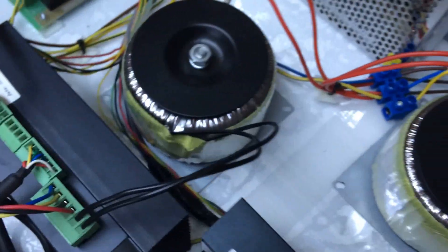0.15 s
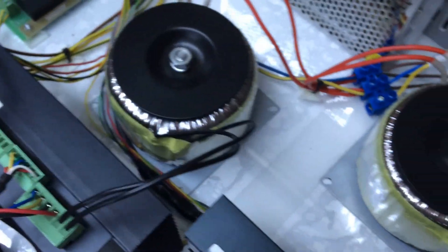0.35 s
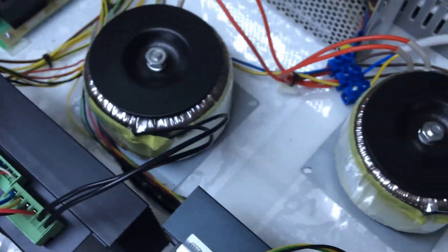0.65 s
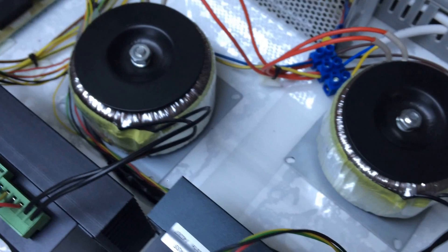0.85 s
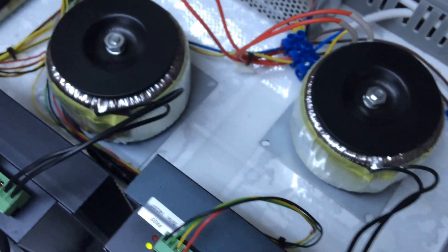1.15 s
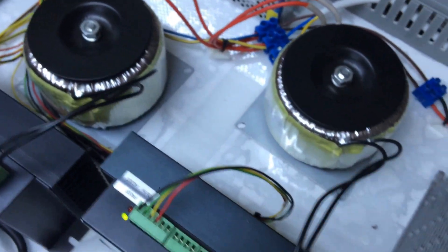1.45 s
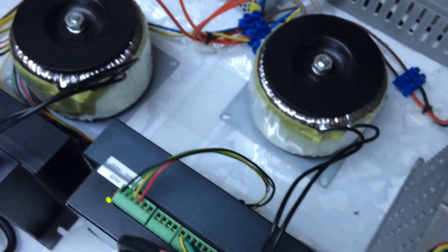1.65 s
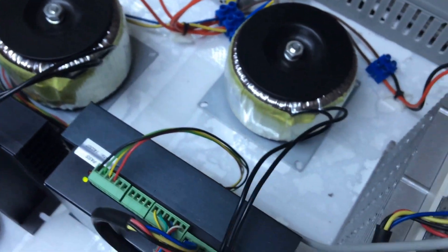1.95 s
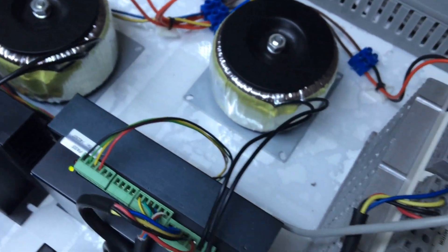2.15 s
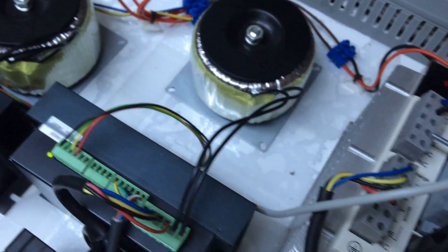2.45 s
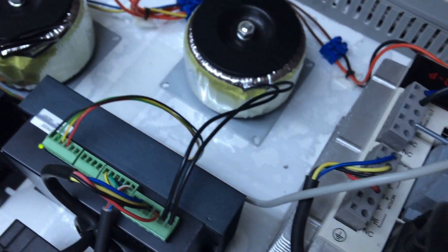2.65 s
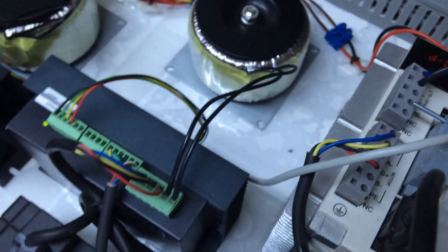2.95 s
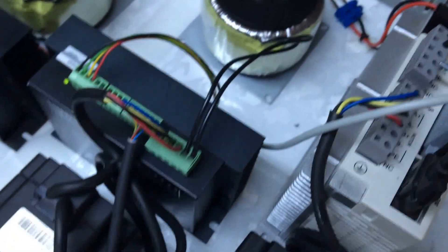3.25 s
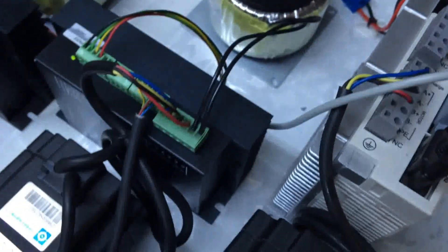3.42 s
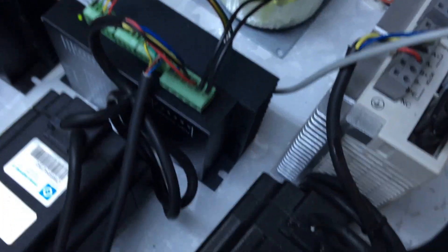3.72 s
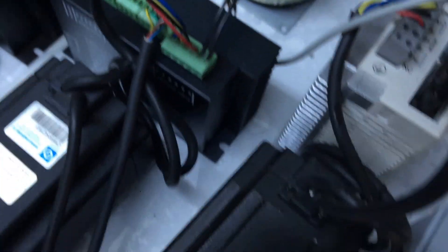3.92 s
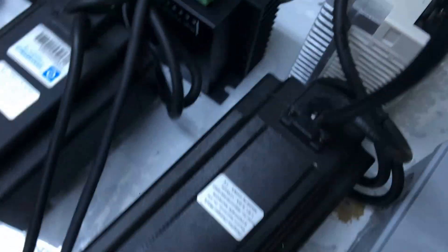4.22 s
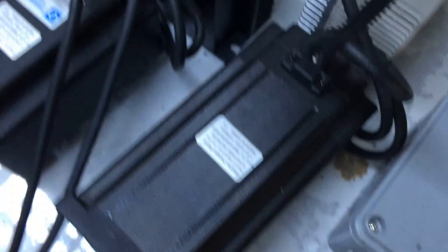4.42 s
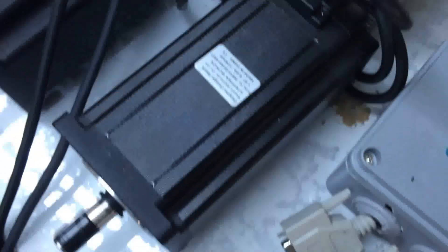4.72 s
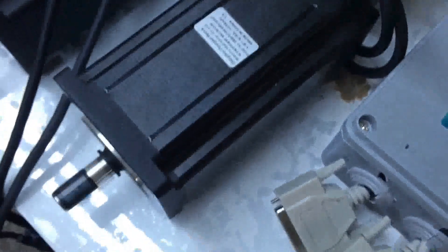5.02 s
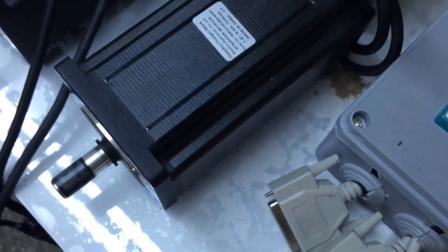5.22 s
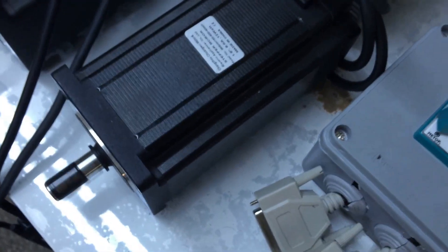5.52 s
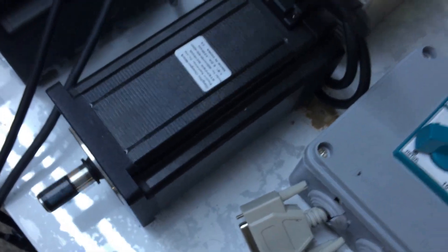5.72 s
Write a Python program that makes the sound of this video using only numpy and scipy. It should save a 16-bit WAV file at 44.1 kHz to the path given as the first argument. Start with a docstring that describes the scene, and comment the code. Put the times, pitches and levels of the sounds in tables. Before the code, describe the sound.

A stepper motor whines steadily and stops, then a closer, much louder one spins up, over low room rumble.

```python
"""A workbench, where two closed-loop stepper motors take turns over the rumble and air of the room.
The far one ramps up, holds about 26 turns a second and ramps down. A hand-held microphone, softly
knocked, moves from the drivers to the near one, which after a low hum ramps up to the same speed.
Their 50 rotor teeth whine through the housings' resonances, mains ripple shakes the pitch,
bearings rustle, the drivers whistle and the near motor's coils hiss."""
import sys
import numpy as np
from scipy import signal
from scipy.fft import rfft, irfft
from scipy.io import wavfile
from scipy.ndimage import uniform_filter1d

SR = 44100
rng = np.random.default_rng(int(sys.argv[2]) if len(sys.argv) > 2 else 0)


def generate_wav(sig):
    """Save sig (samples, or channels by samples) to the path in sys.argv[1] as 16-bit PCM at SR."""
    pcm = np.round(np.clip(np.atleast_2d(sig).T, -1, 1) * 32767).astype(np.int16)
    wavfile.write(sys.argv[1], SR, pcm)


N = 258867
T = np.arange(N) / SR
BINS = np.fft.rfftfreq(2 * N, 1 / SR)

TURNS_HZ, TEETH, STEPS_PER_TURN = 25.7325, 50, 1600
TOOTH_HZ = TEETH * TURNS_HZ
RIPPLE_HZ, DRIVER_CLOCK_HZ = 100, 20000
FAR_START_S, FAR_STOP_S, NEAR_START_S, RAMP_S = .282, 2.426, 4.346, .158


def undb(db):
    """Decibels to gain."""
    return 10 ** (np.asarray(db) / 20)


def unit(x):
    """Scale to rms 1."""
    return x / np.std(x)


def angle(hz):
    """Running phase of a frequency curve, in radians."""
    return 2 * np.pi * np.cumsum(hz) / SR


def walk(rate_hz):
    """Smooth random drift of spread 1."""
    hold = max(int(SR / rate_hz), 1)
    return unit(uniform_filter1d(rng.standard_normal(N)[np.arange(N) // hold], hold))


def spectrum(points):
    """EQ curve through (f/Hz, level/dB) points."""
    hz, db = np.transpose(points)
    return undb(np.interp(np.log(BINS + 1), np.log(hz), db))


def resonance(modes):
    """EQ curve of a set of resonant peaks."""
    return np.sqrt(sum(undb(db) ** 2 / (1 + (2 * (BINS - hz) / width) ** 2) ** 2
                       for hz, width, db in modes))


def colour(x, gain):
    """Causal filter with the given gain, so that resonances ring after the push."""
    cepstrum = irfft(np.log(gain + 1e-9))
    cepstrum[1:N] *= 2
    cepstrum[N + 1:] = 0
    return irfft(rfft(x, 2 * N) * np.exp(rfft(cepstrum)))[:N]


# room tone EQ: (f/Hz, relative level/dB)
ROOM_EQ = [(15, -30), (28, -23), (44, -8), (69, 1.5), (278, -18.5), (326, -18), (363, -29), (501, -22.5),
           (729, -33), (978, -25), (1310, -28.5), (1960, -26.5), (4620, -39), (5140, -42), (7500, -51),
           (10000, -51), (12500, -57), (15000, -49)]
# room faders as the microphone moves: (t/s, rumble level/dB, air level/dB)
ROOM_FADERS = [(.3, -44.5, -42), (1.5, -47.5, -45.5), (4.25, -44, -45), (4.8, -48, -64), (5.87, -47, -60)]


def room_tone(split_hz):
    """Restless rumble under a smooth rush of air."""
    times, *faders = np.transpose(ROOM_FADERS)
    rumble_db, air_db = [np.interp(T, times, db) for db in faders]
    noise = unit(colour(rng.standard_normal(N), spectrum(ROOM_EQ)))
    rumble = signal.sosfiltfilt(signal.butter(2, split_hz, fs=SR, output="sos"), noise)
    air = noise - rumble
    return rumble * undb(rumble_db + 0.98 * walk(14)) + air * undb(air_db + 0.44 * walk(4.92))


def jolts(hits, housing, decay_s):
    """Short rattles ring the housing, as when a rotor breaks away or snaps into place."""
    out = 0
    for s, db in hits:
        rattle = rng.standard_normal(N) * (T >= s) * np.exp(-np.abs(T - s) / decay_s)
        ring = colour(rattle, resonance(housing))
        out = out + undb(db) * ring / np.abs(ring).max()
    return out


def body(housing, ragged_db, radiate_hz):
    """EQ from rotor force to air: main resonances, many small panel modes and little bass."""
    panels = np.append(walk(57.13), 0)  # random peaks and dips along frequency
    # the small modes lie between the cruising tooth harmonics, which sweep them on the ramps
    panels *= np.abs(np.sin(np.pi * BINS / TOOTH_HZ))
    radiation = undb(-40) + BINS ** 4 / (BINS ** 4 + radiate_hz ** 4)
    return (1 + resonance(housing)) * undb(ragged_db * panels) * radiation


def strain(speed, calm_s):
    """Envelope that is 1 below full speed and dies away once the speed holds."""
    last_ramp_s = np.maximum.accumulate(np.where(speed < 1, T, 0))
    return np.exp((last_ramp_s - T) / calm_s)


def tooth_levels(harmonics, dead_spots, unsettled):
    """Faders in dB: each harmonic settles, and dips where the microphone crosses its dead spot."""
    levels = [db + overshoot_db * unsettled for db, overshoot_db in harmonics]
    for harmonic, s, width_s, depth_db in dead_spots:
        away = ((T - s) / width_s) ** 2
        levels[round(harmonic) - 1] += 10 * np.log10((away + undb(depth_db) ** 2) / (away + 1))
    return levels


def rough_running(speed, worst, width):
    """How jerky the rotor is: most around one share of full speed, not at rest or when cruising."""
    return np.exp(-((speed - worst) / width) ** 2) * (speed > 0) * np.sqrt(1 - speed)


def whine(speed, tooth_db, orders, body_eq, jerks_db, jerky, flutter_db,
          ripple_rad, jitter_rad, fade_power):
    """Partials locked to the shaft; on the ramps each flares and drops as it crosses the resonances."""
    # supply ripple and small speed errors rock the shaft, so high orders grow the widest sidebands
    rocking = ripple_rad * np.sin(2 * np.pi * RIPPLE_HZ * T) + jitter_rad * walk(120)
    shaft = angle(TURNS_HZ * speed) + rocking / TEETH
    partials = [(TEETH * k, undb(db + flutter_db * walk(75)) * speed ** fade_power, 0)
                for k, db in enumerate(tooth_db, 1)]
    for order, db in orders:
        size = undb(tooth_db[0] + db + 0.75 * walk(3.29)) * speed ** 6
        partials.append((round(order), size, rng.uniform(0, 2 * np.pi)))
    force = 0
    for order, size, phase in partials:
        makeup = 1 / np.interp(order * TURNS_HZ, BINS, body_eq)  # cancels the EQ at full speed
        force = force + size * makeup * np.sin(order * shaft + phase)
    # at low speed the rotor moves from tooth to tooth in uneven jerks
    stagger = TEETH * shaft + .14 * walk(500)
    jerks = sum(undb(db) * np.sin(k * stagger) for k, db in enumerate(jerks_db, 1))
    return colour(force + jerks * undb(2.5 * walk(200)) * jerky, body_eq)


def bearing_rustle(speed, eq, repeat, ramp_db):
    """Bearing roughness: a share of it repeats with every turn; it is boosted on the ramps."""
    track = rng.standard_normal(int(SR / TURNS_HZ))
    place = np.cumsum(speed) * TURNS_HZ / SR * len(track)
    looped = track[place.astype(int) % len(track)] * speed
    rough = np.sqrt(repeat) * looped + np.sqrt(1 - repeat) * rng.standard_normal(N)
    effort = (speed > 0) * undb(ramp_db * (speed < 1))
    return colour(rough * effort, spectrum(eq)) * np.sqrt(SR / 2)


def hunting(speed, hz, partials, waver_hz):
    """The position loop hunts round its set point: a wavering buzz that mixes with the tooth whine."""
    tooth = angle(TOOTH_HZ * speed)
    hunt = angle(hz + waver_hz * walk(45))
    buzz = sum(undb(db + 2.6 * walk(30)) * np.sin(round(m) * tooth + round(k) * hunt)
               for m, k, db in partials)
    return np.sqrt(2) * buzz * speed ** 4


def switching(speed, carrier_hz, sidebands):
    """Thin sidebands of the driver's switching tone sink into hearing as the tooth rate rises."""
    out = 0
    for multiple, db in sidebands:
        hz = carrier_hz - round(multiple) * TOOTH_HZ * speed
        out = out + undb(db + 2 * walk(2.56)) * np.sin(angle(hz))
    return np.sqrt(2) * out * speed ** 2


def step_fold(speed):
    """The step rate as the driver's clock samples it, as a share of the clock rate (0 to a half)."""
    cycles = STEPS_PER_TURN * TURNS_HZ * speed / DRIVER_CLOCK_HZ
    return np.abs(cycles - np.round(cycles))


def step_chirp(speed, gain_db):
    """The sampled step rate whistles up to half the driver's clock rate and folds back down."""
    fold = step_fold(speed)
    hz = DRIVER_CLOCK_HZ * fold + 250 * walk(1500)
    return undb(gain_db + 3.5 * walk(300)) * (1 - speed) ** 2 * 2 * fold * np.sin(angle(hz))


# housing resonances: (f/Hz, width/Hz, level/dB over the stiff background)
FAR_HOUSING_MODES = [(694, 160, 10.5), (1546, 180, 15), (2050, 240, 23.5), (3180, 160, 10)]
# main whine, tooth harmonics 1 to 4: (cruising level/dB, overshoot/dB)
FAR_WHINE = [(-39.5, 3.5), (-44.5, 0), (-68, -2), (-55, -5.5)]
# dead spots on the microphone's path: (harmonic, t/s, half width/s, depth/dB)
FAR_DIPS = [(2, 1.79, 0.76, -32), (4, 0.83, 0.26, -24)]
# weaker shaft partials: (cycles per turn, level/dB against tooth harmonic 1)
FAR_PARTIALS = [(49, -10.5), (95, -10), (155, -25), (201, -31.5), (214, -34), (250, -33.5), (300, -33),
                (350, -25.5), (400, -36), (500, -39)]
# judder on the ramps, tooth harmonics 1 to 5: (level/dB before the housing)
FAR_JUDDER = (-47.5, -53.5, -53, -65, -68)
# bearing EQ at full speed: (f/Hz, level/dB per Hz)
FAR_BEARING_EQ = [(400, -105), (900, -89), (1290, -83), (1750, -94.5), (2100, -86), (2700, -90),
                  (4000, -101.5), (7000, -106), (9200, -99), (11500, -108), (15000, -111)]
# position loop buzz: (tooth rate multiple, plus hunting rate multiple, level/dB)
FAR_BUZZ = [(0, 1, -62), (0, 2, -58), (0, 3, -57), (0, 4, -65), (2, -1, -73), (2, -2, -54.5)]
# driver whistles: (tooth rate multiple below the carrier, level/dB)
FAR_WHISTLES = [(4, -75), (5, -70), (6, -88), (7, -104), (8, -79)]
# short rattles that ring the housing, the one at 0.36 s falling in the ramp's 2 kHz flare: (t/s, peak level/dB)
FAR_HITS = [(.2815, -31), (.3595, -32), (2.418, -40), (2.825, -38.5)]


def far_motor():
    """One whole move: ramp up, cruise, ramp down; the whine stutters until the rotor has settled."""
    speed = np.clip(np.minimum(T - FAR_START_S, FAR_STOP_S - T) / RAMP_S, 0, 1)
    body_eq = body(FAR_HOUSING_MODES, ragged_db=5, radiate_hz=545)
    levels = tooth_levels(FAR_WHINE, FAR_DIPS, strain(speed, calm_s=0.66))
    tone = whine(speed, levels, FAR_PARTIALS, body_eq, FAR_JUDDER,
                 jerky=rough_running(speed, worst=0.57, width=0.18),
                 flutter_db=.5 + 1.5 * strain(speed, calm_s=1),
                 ripple_rad=0.034, jitter_rad=0.029, fade_power=3.3)
    return (tone + bearing_rustle(speed, FAR_BEARING_EQ, repeat=0.63, ramp_db=3.5)
            + hunting(speed, hz=508.5, partials=FAR_BUZZ, waver_hz=2.6)
            + switching(speed, carrier_hz=20076.5, sidebands=FAR_WHISTLES)
            + step_chirp(speed, gain_db=-52.5)
            + jolts(FAR_HITS, FAR_HOUSING_MODES, decay_s=0.0052))


# handling noise: (t/s, envelope peak level/dB)
HAND_KNOCKS = [(0.37, -31), (2.899, -42), (3.081, -32), (3.266, -35), (3.402, -40)]


def microphone_bumps(hz, rise_s):
    """The hand knocks the microphone: each soft thump swells and dies within two or three cycles."""
    out = 0
    for s, db in HAND_KNOCKS:
        age = np.maximum(T - s, 0)
        envelope = (age / rise_s * np.exp(1 - age / rise_s)) ** 2
        out = out + undb(db) * envelope * np.sin(2 * np.pi * hz * age)
    return out


def low_hum(start_s=3.49, end_s=4.32, attack_s=0.081, hold_s=0.27, fade_db_per_s=-20.5):
    """An unsteady low tone with a weak octave swells, holds and fades; its pitch follows its strength."""
    age = T - start_s
    attack = np.clip(age / attack_s, 0, 1)
    fade = undb(fade_db_per_s * np.maximum(age - attack_s - hold_s, 0))
    strength = attack * fade * np.clip((end_s - T) / 0.031, 0, 1)
    phase = angle(hz=68.3 + 3.79 * strength + 1.3 * walk(12))
    tone = np.sin(phase) + undb(-14.5) * np.sin(2 * phase)
    return np.sqrt(2) * strength * undb(-36.5 + 2.4 * walk(16)) * tone


# two narrow treble bands of coil noise: (f/Hz, width/Hz, relative level/dB)
HISS_BANDS = [(9210, 270, 0), (10840, 440, -7.5)]


def coil_hiss(speed, rest_db=-76.5, run_db=-61, boost_db=14, flare_db=13.5, settle_s=0.34):
    """Chopped coil current hisses, throbs with the supply ripple and swells under acceleration."""
    throb = 1 + 0.21 * np.sin(2 * np.pi * RIPPLE_HZ * T)
    effort = np.exp(-(np.maximum(T - NEAR_START_S - RAMP_S, 0) / settle_s) ** 2)
    flare = (2 * step_fold(speed)) ** 2  # peaks as the step whistle meets the bands
    running_db = run_db + boost_db * effort + flare_db * flare
    idle_db = rest_db + 5 * (T - NEAR_START_S)  # creeps up as the microphone approaches
    hiss = unit(colour(rng.standard_normal(N), resonance(HISS_BANDS)) * throb)
    return hiss * undb(np.where(speed > 0, running_db, idle_db))


# housing resonances: (f/Hz, width/Hz, level/dB over the stiff background)
NEAR_HOUSING_MODES = [(818, 100, 19.8), (1010, 280, 14.3), (1227, 310, 17.6), (2374, 300, 10.8),
                      (3560, 770, 10.8)]
# main whine, tooth harmonics 1 to 4: (cruising level/dB, overshoot/dB)
NEAR_WHINE = [(-19.5, 6), (-41.5, 10), (-24.5, 1), (-45.5, 5.2)]
# dead spots on the microphone's path: (harmonic, t/s, half width/s, depth/dB)
NEAR_DIPS = [(3, 4.66, 0.19, -5.5), (4, 4.67, 0.4, -28)]
# weaker shaft partials: (cycles per turn, level/dB against tooth harmonic 1)
NEAR_PARTIALS = [(31, -32.5), (46, -22), (49, -13.5), (70, -48), (90, -27), (96, -39), (101, -33),
                 (102, -29), (158, -33.5), (250, -42.5), (261, -43.5), (300, -32.5), (350, -49)]
# judder on the ramps, tooth harmonics 1 to 5: (level/dB before the housing)
NEAR_JUDDER = (-38.5, -43, -64, -44, -47.5)
# bearing EQ at full speed: (f/Hz, level/dB per Hz)
NEAR_BEARING_EQ = [(400, -100), (680, -91), (850, -72), (1080, -78), (1300, -74), (1750, -101),
                   (2550, -79.5), (3150, -93), (3860, -87.5), (4400, -102), (5100, -90.5), (7700, -94.5),
                   (12000, -102), (15000, -102)]
# position loop buzz: (tooth rate multiple, plus hunting rate multiple before rounding, level/dB)
NEAR_BUZZ = [(0, 1, -63), (0, 2, -46.5), (0, 3, -51.5), (2, -3, -49.5), (2, -1.5, -52), (2, 2, -67),
             (2, 2.5, -62)]
# driver whistles: (tooth rate multiple below the carrier, level/dB)
NEAR_WHISTLES = [(4, -68), (5, -76), (6, -69)]
# breakaway jolt: (t/s, peak level/dB)
NEAR_HITS = [(4.346, -31.5)]


def near_motor():
    """Ramps up and keeps running, close to the microphone."""
    speed = np.clip((T - NEAR_START_S) / RAMP_S, 0, 1)
    body_eq = body(NEAR_HOUSING_MODES, ragged_db=4.5, radiate_hz=284)
    levels = tooth_levels(NEAR_WHINE, NEAR_DIPS, strain(speed, calm_s=0.3))
    tone = whine(speed, levels, NEAR_PARTIALS, body_eq, NEAR_JUDDER,
                 jerky=rough_running(speed, worst=0.43, width=0.35),
                 flutter_db=0.11 + 1.85 * strain(speed, calm_s=0.086),
                 ripple_rad=0.12, jitter_rad=0.032, fade_power=1)
    return (tone + bearing_rustle(speed, NEAR_BEARING_EQ, repeat=.7, ramp_db=9)
            + hunting(speed, hz=473.7, partials=NEAR_BUZZ, waver_hz=2.23)
            + switching(speed, carrier_hz=20112, sidebands=NEAR_WHISTLES)
            + coil_hiss(speed)
            + step_chirp(speed, gain_db=-45)
            + jolts(NEAR_HITS, NEAR_HOUSING_MODES, decay_s=.005))


def scene():
    """Mono mix of both motors, the hum and the handling noise over the room tone."""
    foreground = far_motor() + near_motor() + low_hum() + microphone_bumps(hz=76, rise_s=0.0053)
    return (foreground + room_tone(split_hz=960))[None]


def record(dry):
    """A steep low-pass cuts the top."""
    top_hz = 15330
    return signal.sosfilt(signal.ellip(10, .1, 80, top_hz, fs=SR, output="sos"), dry)


dry = scene()
out = record(dry)
generate_wav(out)
```